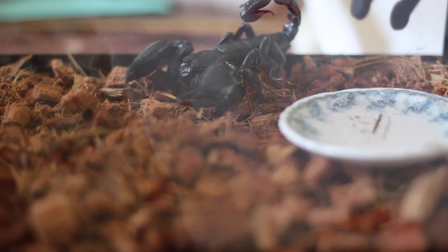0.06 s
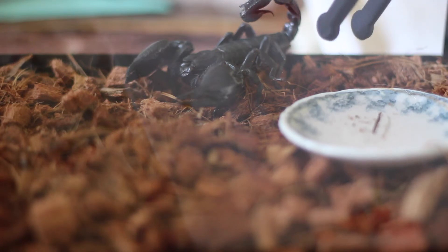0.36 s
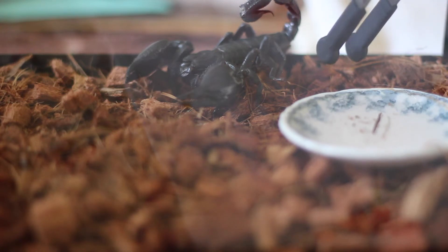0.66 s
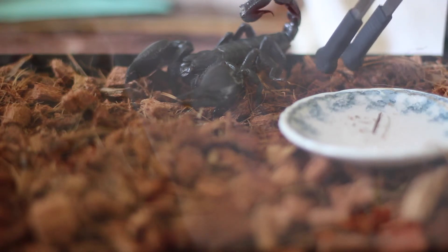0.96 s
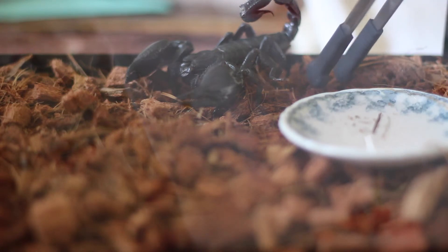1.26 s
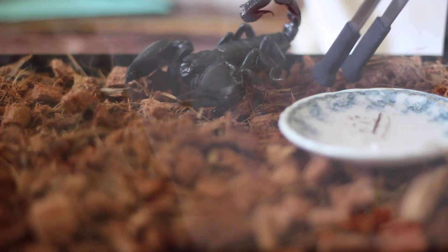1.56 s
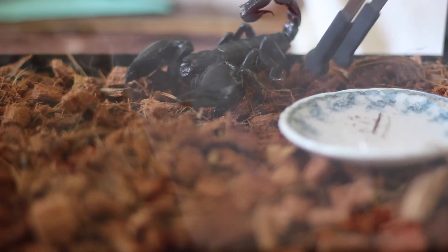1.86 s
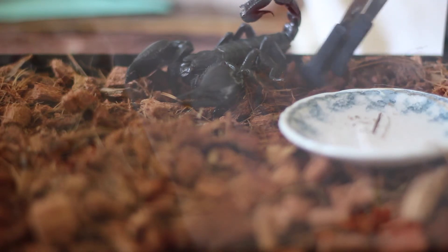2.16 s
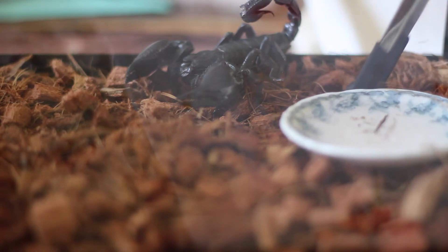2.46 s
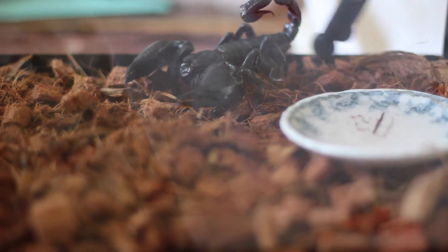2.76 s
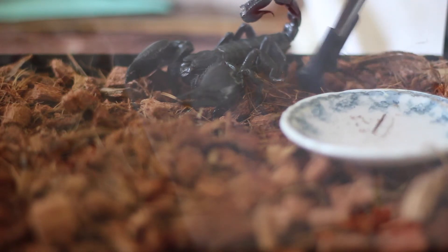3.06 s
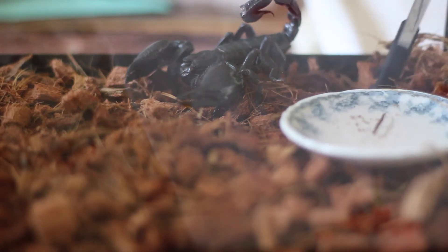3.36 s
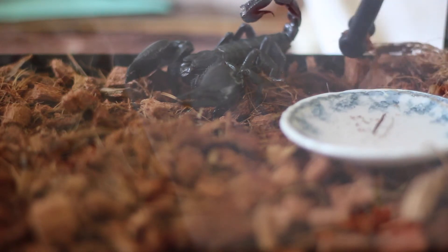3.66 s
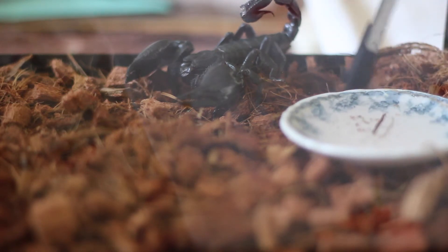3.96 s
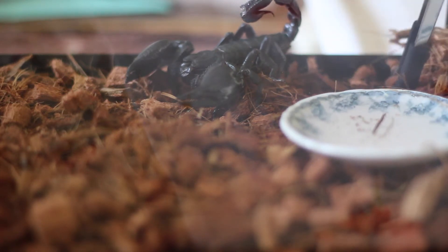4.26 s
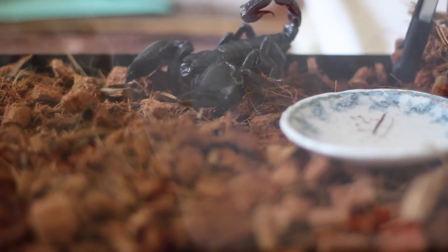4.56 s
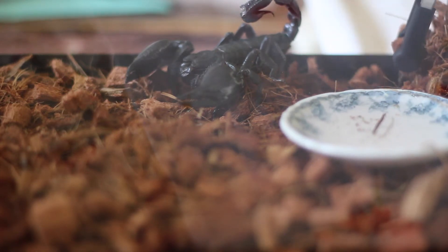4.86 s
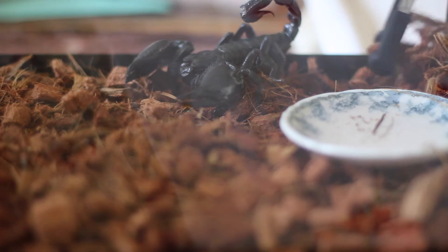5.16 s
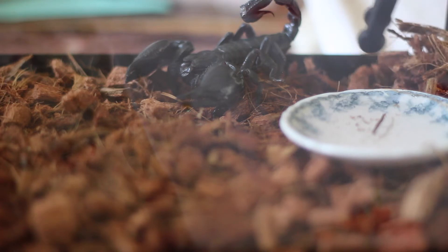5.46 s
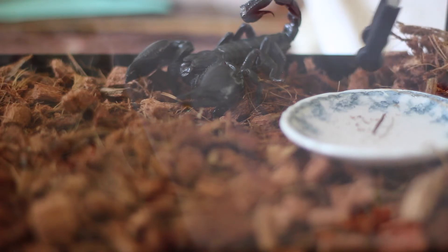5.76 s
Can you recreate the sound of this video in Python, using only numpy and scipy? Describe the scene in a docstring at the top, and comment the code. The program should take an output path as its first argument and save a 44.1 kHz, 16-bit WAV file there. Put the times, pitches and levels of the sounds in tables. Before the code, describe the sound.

Sharp clacks and hollow knocks of tongs against a glass tank, with faint crunching of dry coconut fibre in a quiet room.

```python
"""Steel feeding tongs at work in a glass terrarium, heard from one microphone close by.
Bare steel taps the rim and scrapes along it once, the padded tips knock on the floor pane,
and the box answers with a hollow boom. In between, the tips drag dry coconut fibre through
the bedding: it rustles, crunches and snaps. Two faint squeaks come near the end.
Behind it all lies a quiet room with a low hum."""
import sys
import numpy as np
from scipy import signal
from scipy.fft import rfft, irfft
from scipy.io import wavfile

SR = 44100
rng = np.random.default_rng(int(sys.argv[2]) if len(sys.argv) > 2 else 0)


def to_wav(sig):
    """Store sig (one row per channel, or 1-D mono) as 16-bit WAV at the path in sys.argv[1].

    Samples outside -1..1 are clipped; the rate is SR.
    """
    pcm = np.clip(np.atleast_2d(sig), -1, 1) * 32767
    pcm = np.round(pcm).astype(np.int16)
    wavfile.write(sys.argv[1], SR, pcm.T)  # frames by channels


N = 256662


def rim_taps(rim):
    """Bare steel taps the rim; the harder the contact, the higher its treble corner."""
    # taps: t/s, clack level/dB, contact corner/Hz, boom level/dB, boom f/Hz, boom swell/s
    taps = [(0.4840, -15, 17000, -18.5, 422.5, 0.012), (0.598, -45.5, 6000, -37.5, 440, 0.014),
            (0.707, -45.5, 3970, -40.5, 440, 0.015), (0.8149, -31, 4240, -30, 432, .013),
            (0.989, -48, 6000, -37.5, 420, 0.0085), (1.038, -39, 6160, -32, 440, .013),
            (1.0792, -39, 6000, -34.5, 430, 0.014), (1.1258, -42, 6000, -35, 449, 0.021),
            (2.141, -52.5, 4100, -68, 440, 0.01), (2.3021, -19.5, 9700, -15, 418, 0.012),
            (2.334, -35, 6000, -24, 434, 0.01), (2.552, -61, 14000, -32, 429, 0.019),
            (2.580, -40, 2950, -41.5, 465, 0.018)]
    return blows(taps, rim)


def floor_knocks(floor):
    """The padded tips knock on the floor pane; once, the second tip lands just after the first."""
    # knocks: t/s, clack level/dB, contact corner/Hz, boom level/dB, boom f/Hz, boom swell/s
    knocks = [(0.1785, -44, 3000, -66, 420, .010), (3.335, -21.5, 6030, -18.5, 401.5, 0.0098),
              (3.3392, -32.5, 2800, -53, 448, 0.026), (4.2418, -29.5, 3800, -23.5, 400, 0.0093),
              (4.333, -47.5, 5000, -45, 390, 0.009), (4.448, -52, 4000, -41, 395, 0.013),
              (4.6572, -27.5, 2400, -25, 404, 0.0075), (4.695, -44, 2400, -40, 435, 0.0077),
              (4.782, -48, 4000, -58, 405, .010)]
    return blows(knocks, floor)


def blows(contacts, surface):
    """Each blow of the tongs sets off a clack in the glass and a boom in the box."""
    out, t = np.zeros(N), np.arange(len(surface)) / SR
    for s, clack_db, corner_hz, boom_db, boom_hz, swell_s in contacts:
        clack = gain_of(clack_db) * softened(surface, corner_hz)
        boom = gain_of(boom_db) * box_boom(t, boom_hz, swell_s) / np.sqrt(2)
        add(out, s, clack + boom)
    return out


def rim_scrape(rim, start_s=2.445, slips_per_s=600, slip_db=-51.5):
    """Steel slides along the rim, pressing ever harder: tiny slips ring the rim, box and tongs."""
    out, t = np.zeros(N), np.arange(len(rim)) / SR
    pressure = stroke(length_s=0.099, attack_s=0.012, release_s=0.02, swell_db=16.5)
    signs = rng.choice([-1, 1], len(pressure))
    slipping = rng.random(len(pressure)) < slips_per_s / SR
    slips = gain_of(slip_db) * unit_rms(signs * slipping) * pressure
    glass = softened(rim, corner_hz=7000)
    box = box_boom(t, hz=415, swell_s=0.0083)
    zing = gain_of(-11) * ringing(t, [(14000, 800, 0)])
    response = glass / np.linalg.norm(glass) + gain_of(5) * box / np.linalg.norm(box) + zing
    add(out, start_s, signal.fftconvolve(slips, response))
    return out


def rim_response():
    """The rim struck by bare steel: bright and sharp."""
    # spectrum of the rim's dense clack: f/Hz, level/dB
    colour = [(150, -14), (330, 3.5), (550, -25), (700, -9.5), (1100, -14.5), (1420, 0), (1900, -7),
              (2300, 3), (2900, -2.5), (3700, 2), (5600, -7), (11000, -3.5), (14000, -5), (16000, -11)]
    # modes of the walls with the tongs: f/Hz, width/Hz, level/dB
    modes = [(1350, 22, -9), (1770, 33, -11), (2110, 54, 0), (2630, 27, -7), (2840, 21, -6), (3160, 30, -1),
             (3770, 41, -5), (4090, 96, -6), (4330, 93, -6), (4550, 18, -6), (4850, 15, -10),
             (4960, 24, -7), (5140, 52, -10), (5350, 15, -12), (5590, 51, -13), (6000, 22, -17),
             (6210, 34, -12), (6420, 34, -18), (6710, 38, -16), (6960, 53, -12), (7470, 33, -17),
             (8520, 130, -20), (8910, 66, -14), (10100, 26, -18), (10700, 58, -18), (12000, 58, -20),
             (13600, 51, -18), (14000, 40, -14)]
    return pane(colour, modes, ring_db=-1, room_db=-13, tick_db=1.5, tick_s=0.0014, rise_s=0.0013)


def floor_response():
    """The floor pane when struck, damped by the bedding."""
    # spectrum of the floor's dense clack: f/Hz, level/dB
    colour = [(150, -25), (330, -19), (570, 7.5), (680, -17), (900, -3), (1080, -4.5), (1350, 2.5),
              (1750, -4), (2250, 5.5), (2700, -8), (3300, -5), (4400, -4), (5200, -9.5), (16000, -12)]
    # modes of the floor pane: f/Hz, width/Hz, level/dB
    modes = [(759, 11, 1), (915, 58, -11), (1300, 36, 0), (1705, 40, -3), (1752, 35, 3.5), (2060, 26, -6),
             (2090, 10, -2), (2237, 130, 4.5), (2300, 30, -6), (2930, 25, -13), (3550, 25, -13),
             (4410, 78, -7), (6050, 60, -9), (6800, 70, -15)]
    return pane(colour, modes, ring_db=-0.5, room_db=-15.5, tick_db=-22, tick_s=0.0019, rise_s=0.0011)


def pane(colour, modes, ring_db, room_db, tick_db, tick_s, rise_s):
    """Glass answers one contact: a tick, a clack and ringing modes up close, then the room's tail."""
    # decay of the clack in the tank: f/Hz, t60/s
    tank_t60 = [(300, 0.15), (2000, 0.068), (5000, 0.068), (12000, 0.021)]
    # decay of the clack in the room: f/Hz, t60/s
    room_t60 = [(300, 0.58), (2000, 0.21), (5000, 0.23), (12000, 0.09)]
    t = np.arange(SR // 2) / SR
    clack = dying_noise(t, colour, tank_t60)
    ring = gain_of(ring_db) * np.linalg.norm(clack) * ringing(t, modes)
    room = gain_of(room_db) * dying_noise(t, colour, room_t60) * (1 - np.exp(-t / 0.017))
    onset = 1 - np.exp(-(t / rise_s) ** 2)
    tick = gain_of(tick_db) * np.exp(-t / tick_s) * rng.standard_normal(len(t))
    return ((clack + ring + room) * onset + tick) / np.sqrt(2)


def box_boom(t, hz, swell_s, steepness=4.65, echo_s=0.03, echo_db=-20, room_db=-23, room_t60_s=0.39):
    """The box's low modes swell over a few cycles and die; a wall and the room send them back."""
    def pulse(age):
        u = np.maximum(age, 0) / swell_s
        swell = (u * np.exp((1 - u ** 2) / 2)) ** (steepness / 2)
        return np.sqrt(2) * swell * np.sin(2 * np.pi * hz * age)
    # the box's long-ringing low modes: f/Hz, level/dB, t60/s
    modes = [(404, -21, .15), (463, -18, .55), (549, -41, 1.2)]
    # spectrum of the boom out in the room: f/Hz, level/dB
    colour = [(250, -23), (380, 4), (430, -16), (490, 27), (600, 1), (1200, -57)]
    room = coloured(rng.standard_normal(len(t)), colour) * gain_of(room_db - 60 * t / room_t60_s)
    ring = sum(gain_of(db - 60 * t / t60) * np.sin(2 * np.pi * f * t) for f, db, t60 in modes)
    echo = gain_of(echo_db) * pulse(t - echo_s)
    return pulse(t) + echo + (room + ring) * (1 - np.exp(-t / swell_s))


def dragged_fibre(clicks_per_s=7000, crackles_per_s=110, crackle_s=0.001, crackle_db=-6):
    """Dry strands rub in countless small, uneven clicks; now and then one catches and crackles."""
    # drags through the bedding: t/s, length/s, fine rustle level/dB, coarse crunch level/dB
    drags = [(2.01, 0.15, -65, -70), (2.228, 0.13, -60, -57.5), (2.31, 0.084, -64, -54.5),
             (2.483, 0.085, -57, -51.5), (3.13, 0.052, -56, -57), (3.158, 0.064, -76, -51.5),
             (3.23, 0.12, -53, -55.5), (3.365, 0.093, -62.5, -65), (3.573, 0.053, -59, -61.5),
             (3.995, .07, -67, -61.5), (4.098, 0.15, -56, -58.5), (4.14, 0.058, -54.5, -53),
             (4.267, 0.13, -61, -58), (4.405, 0.245, -62, -64), (4.69, 0.097, -71, -61),
             (5.18, .06, -63, -74)]
    # spectrum of the fine rustle: f/Hz, level/dB
    fine = [(3000, -4), (6000, -1.5), (9000, -0.5), (12500, -3.5), (16000, -1)]
    # spectrum of the coarse crunch: f/Hz, level/dB
    coarse = [(300, 3), (1000, 0.5), (2200, 3), (4200, -3.5), (7000, -9), (12000, -7)]
    # resonances of the tongs that colour the rustle: f/Hz, width/Hz, boost/dB
    tong_peaks = [(3720, 150, 5), (4280, 150, 7), (4620, 150, 4), (8970, 300, 4), (9900, 250, 3),
                  (11950, 600, 5)]
    out, rustle_level, crunch_level = np.zeros((3, N))
    for s, length_s, fine_db, coarse_db in drags:
        pull = stroke(length_s, attack_s=0.023, release_s=0.016)
        add(rustle_level, s, gain_of(fine_db) * pull)
        add(crunch_level, s, gain_of(coarse_db) * pull)
    tongs = gain_of(sum(db * resonance(hz, width) for hz, width, db in tong_peaks))
    for level, colour in ((rustle_level, fine), (crunch_level, coarse)):
        sizes = gain_of(-np.minimum(rng.exponential(1, N), 4)) * rng.standard_normal(N)
        clicks = sizes * (rng.random(N) < clicks_per_s / SR)
        out += level * coloured(irfft(rfft(clicks) * tongs, N), colour)
    catches = 1.0 * (rng.random(N) < crackles_per_s / SR)
    decays = signal.lfilter([1], [1, -np.exp(-1 / (crackle_s * SR))], catches)
    strand = np.sqrt(resonance(centre_hz=12000, width_hz=2500))
    crackle = unit_rms(irfft(rfft(decays * rng.standard_normal(N)) * strand * tongs, N))
    return out + gain_of(crackle_db) * rustle_level * crackle


def fibre_snaps(decay_s=0.0016, tail_db=-18, tail_s=0.017, skirt_db=-26):
    """A strand breaks with a thin tick that bounces briefly between the panes."""
    # single fibres snapping: t/s, level/dB, centre f/Hz
    snaps = [(0.179, -45.5, 8950), (2.036, -50, 12000), (2.286, -40, 10900), (2.399, -52, 9000),
             (2.655, -54, 11430), (3.438, -51, 14000), (4.035, -48, 13000), (4.0498, -41, 10400),
             (4.108, -45.5, 7400), (4.216, -43, 11000), (4.230, -39.5, 3930), (4.335, -44, 12000),
             (4.46, -45, 13000), (4.552, -57, 8000), (4.6235, -51, 13000), (4.657, -38, 6540),
             (5.030, -54, 10100), (5.308, -46, 13500)]
    out, t = np.zeros(N), np.arange(4096) / SR
    decay = np.exp(-t / decay_s) + gain_of(tail_db) * np.exp(-t / tail_s)
    for s, db, hz in snaps:
        tick = coloured(rng.standard_normal(len(t)), [(hz / 2, skirt_db), (hz, 0), (hz * 2, skirt_db)])
        add(out, s, gain_of(db) * tick * decay)
    return out


def squeaks(width_hz=60):
    """Brief, slightly unsteady tones just above the hiss."""
    # faint thin squeaks: t/s, length/s, f/Hz, level/dB
    tones = [(5.227, .06, 2670, -65), (5.597, 0.14, 2340, -69)]
    out = np.zeros(N)
    for s, length_s, hz, db in tones:
        t = np.arange(0, length_s, 1 / SR)
        noise = rng.standard_normal(2 * len(t) - 1)
        tone = signal.fftconvolve(noise, ringing(t, [(hz, width_hz, 0)]), "valid")
        add(out, s, gain_of(db) * unit_rms(tone) * np.hanning(len(t)))
    return out


def room_tone(air_db=-47):
    """The room around the tank: steady rumble and hiss with a wavering hum on top."""
    # spectrum of the rumble and hiss: f/Hz, level/dB
    air = [(15, -66), (25, -32), (43, -19), (108, -2.5), (229, -9), (270, -4.5), (354, -15), (394, -13),
           (775, -23), (840, -23.5), (1190, -29.5), (2280, -33), (2480, -33.5), (11600, -40),
           (16000, -42.5)]
    # the hum and its faint overtones: f/Hz, width/Hz, level/dB
    hum = [(60.8, 6.5, -66), (101, 15, -60.5), (121.6, 5, -54), (160, 27, -57.5), (276.8, 13, -55),
           (553.6, 24, -65.5), (723, 20, -72), (803, 15, -73)]
    out = gain_of(air_db) * coloured(rng.standard_normal(N), air)
    for hz, width_hz, db in hum:
        band = irfft(rfft(rng.standard_normal(N)) * resonance(hz, width_hz), N)
        out += gain_of(db) * unit_rms(band)
    return out


def dying_noise(t, colour, t60s, band_count=9):
    """Countless overlapping modes: noise whose bands each die at their own speed."""
    spectrum = rfft(coloured(rng.standard_normal(len(t)), colour))
    hz, centres = np.fft.rfftfreq(len(t), 1 / SR), np.geomspace(250, 16000, band_count)
    shares = [curve_at(np.c_[centres, row], hz) for row in np.eye(band_count)]
    bands = [irfft(spectrum * share, len(t)) for share in shares]
    return sum(band * gain_of(-60 * t / curve_at(t60s, f)) for band, f in zip(bands, centres))


def ringing(t, modes):
    """A struck object's modes, with an energy of one; a narrow mode rings long."""
    sound = sum(gain_of(db) * width * np.exp(-np.pi * width * t)
                * np.sin(2 * np.pi * (hz * t + rng.random())) for hz, width, db in modes)
    return sound / np.linalg.norm(sound)


def resonance(centre_hz, width_hz):
    """The power curve of one resonance across the scene's spectrum, peaking at one."""
    hz = np.fft.rfftfreq(N, 1 / SR)
    return 1 / (1 + (2 * (hz - centre_hz) / width_hz) ** 2)


def softened(sound, corner_hz):
    """A soft contact lasts longer and excites less treble."""
    return signal.sosfilt(signal.butter(2, corner_hz, fs=SR, output="sos"), sound)


def stroke(length_s, attack_s, release_s, swell_db=0):
    """The envelope of one rubbing movement: attack, a flat or swelling hold, release."""
    t = np.arange(0, length_s + release_s, 1 / SR)
    edges = np.clip(np.minimum(t / attack_s, 1 - (t - length_s) / release_s), 0, 1)
    return edges * gain_of(swell_db * (np.minimum(t / length_s, 1) - 0.5))


def coloured(x, points):
    """Shapes x by (f/Hz, level/dB) points, at an rms of one."""
    hz = np.fft.rfftfreq(len(x), 1 / SR)
    return unit_rms(irfft(rfft(x) * gain_of(curve_at(points, hz)), len(x)))


def curve_at(points, hz):
    """Joins (f/Hz, value) points by straight lines on a log frequency axis."""
    f, value = np.transpose(points)
    return np.interp(np.log(hz + 1), np.log(f + 1), value)


def gain_of(db):
    """Decibels to amplitude."""
    return 10 ** (np.asarray(db) / 20)


def unit_rms(x):
    """Scales to an rms of one."""
    return x / np.sqrt(np.mean(x ** 2) + 1e-20)


def add(mix, s, sound):
    """Mixes a sound in at time s."""
    part = mix[round(s * SR):][:len(sound)]
    part += sound[:len(part)]


def scene():
    """Tank and room in mono, from one microphone near the glass."""
    rim, floor = rim_response(), floor_response()
    tongs = rim_taps(rim) + floor_knocks(floor) + rim_scrape(rim)
    return (room_tone() + tongs + dragged_fibre() + fibre_snaps() + squeaks())[None]


def record(dry):
    """The recorder's band limit cuts off the highest treble."""
    edge_hz = 15900
    lowpass = signal.firwin(255, edge_hz, window=("kaiser", 9), fs=SR)
    return signal.oaconvolve(dry, lowpass[None], "same")


dry = scene()
out = record(dry)
to_wav(out)
```